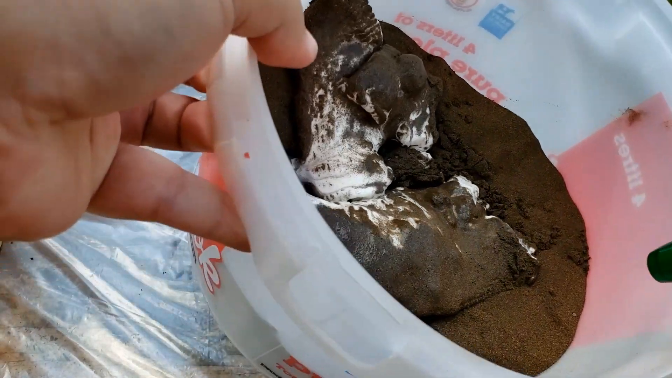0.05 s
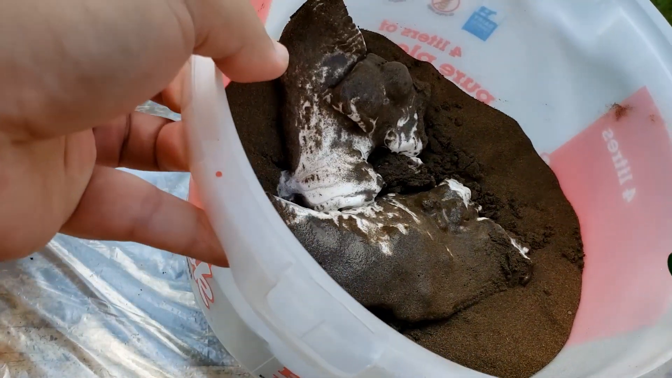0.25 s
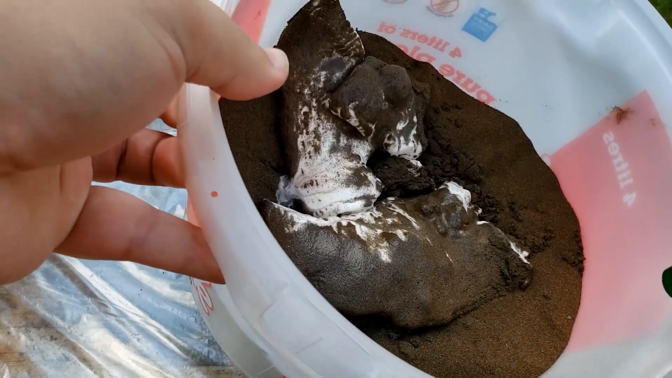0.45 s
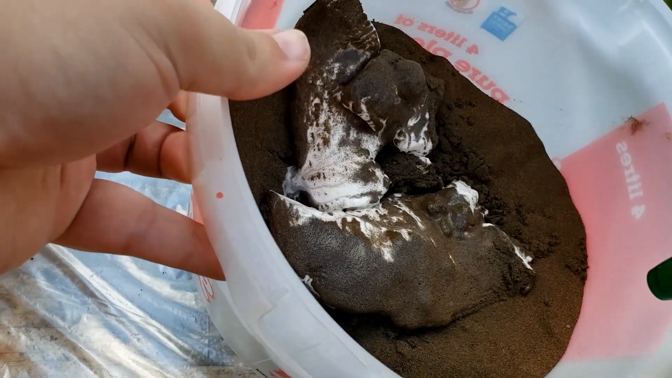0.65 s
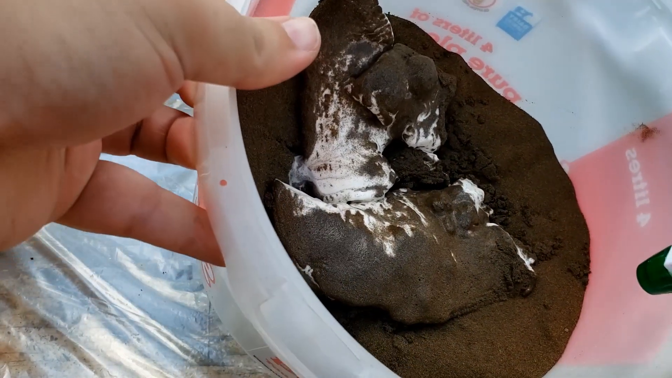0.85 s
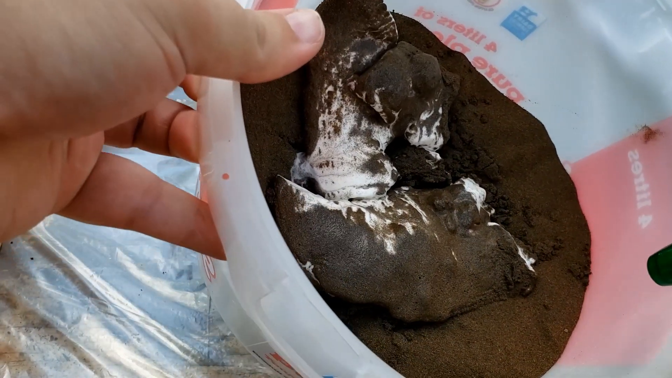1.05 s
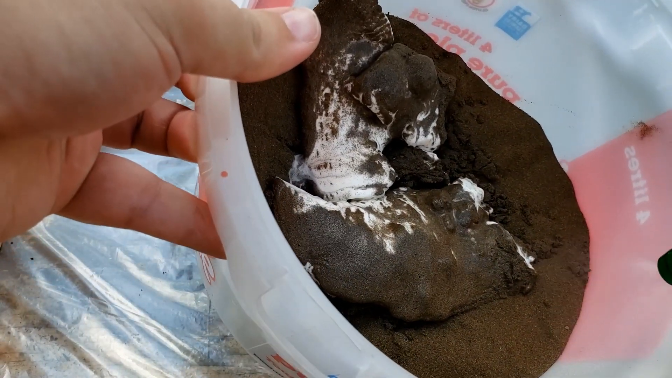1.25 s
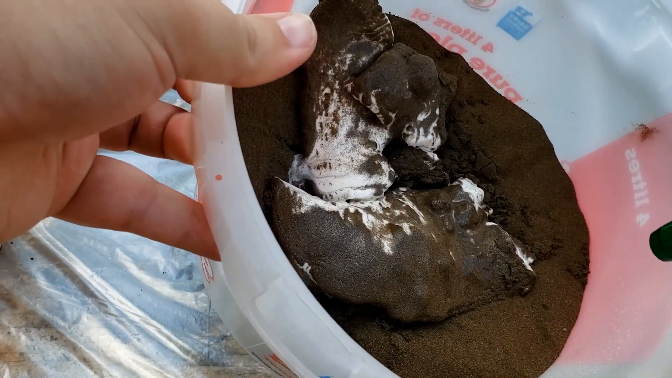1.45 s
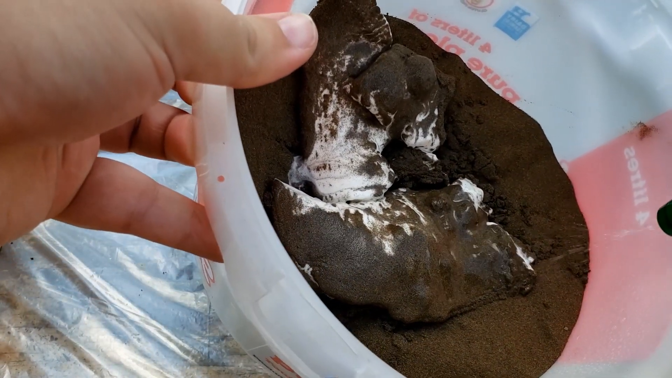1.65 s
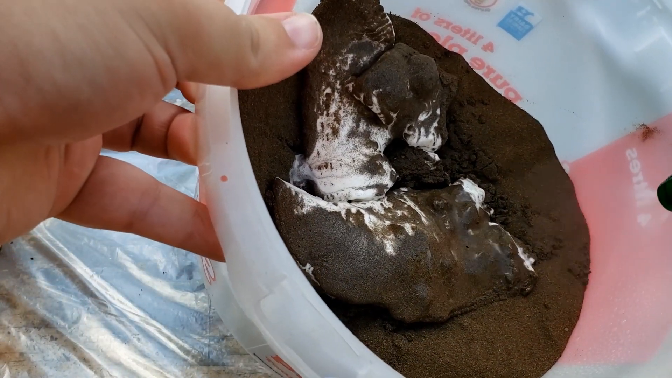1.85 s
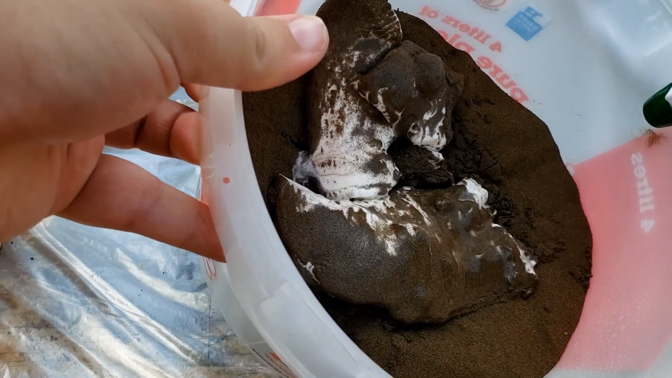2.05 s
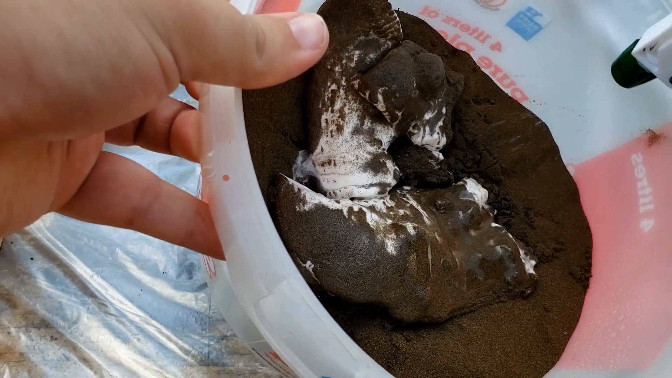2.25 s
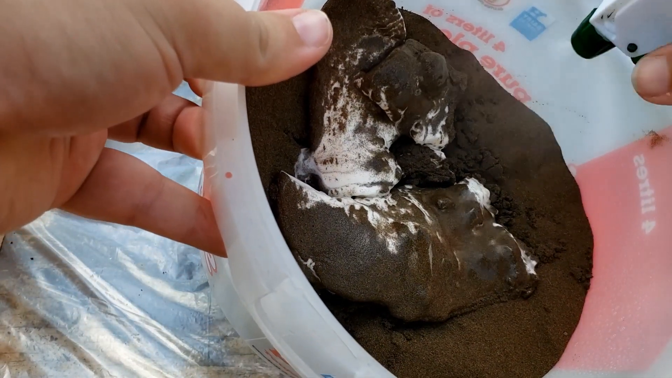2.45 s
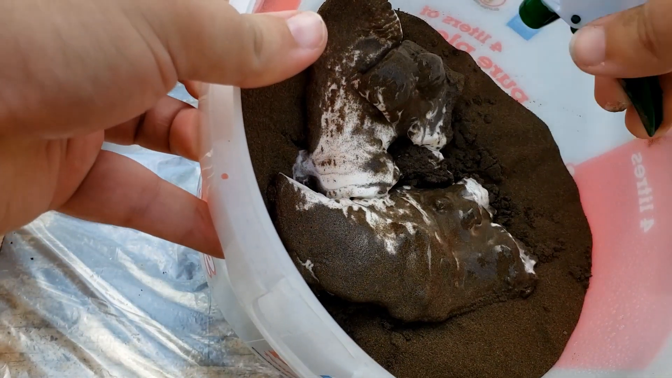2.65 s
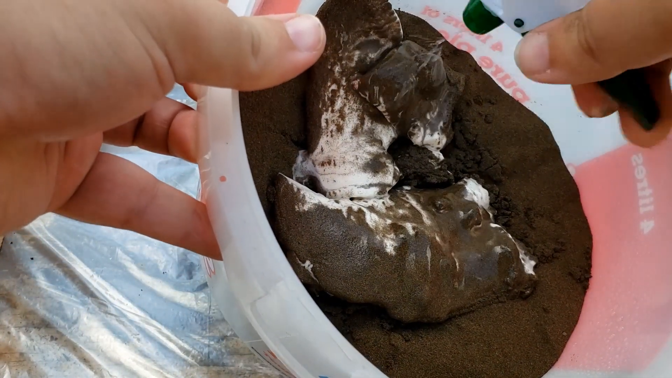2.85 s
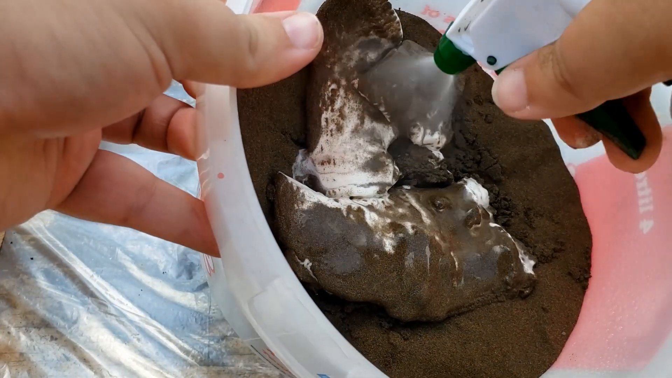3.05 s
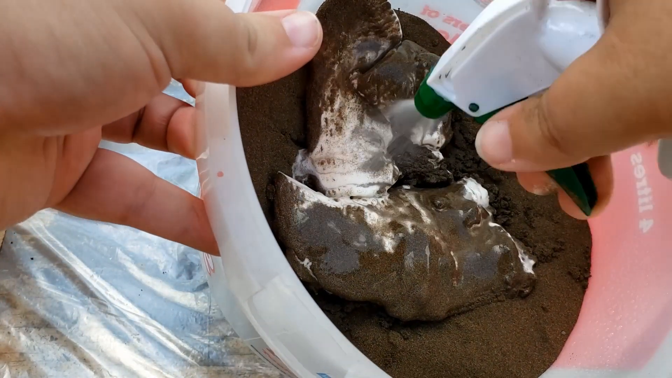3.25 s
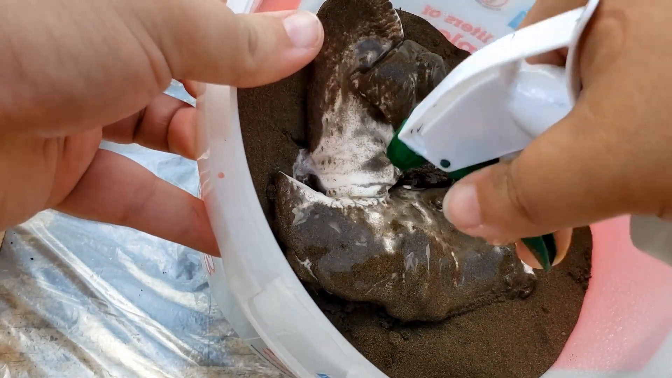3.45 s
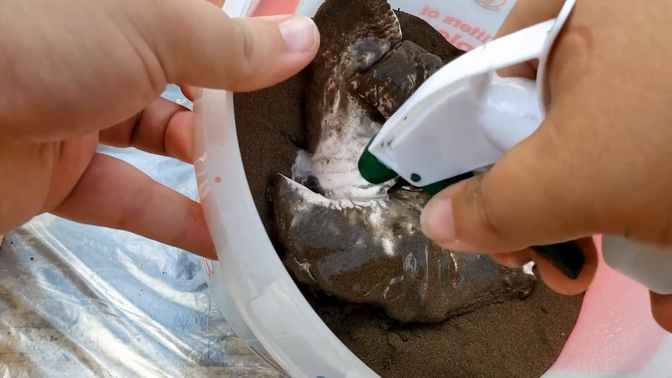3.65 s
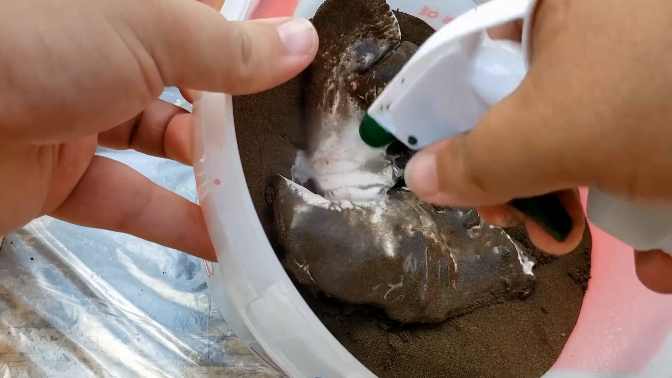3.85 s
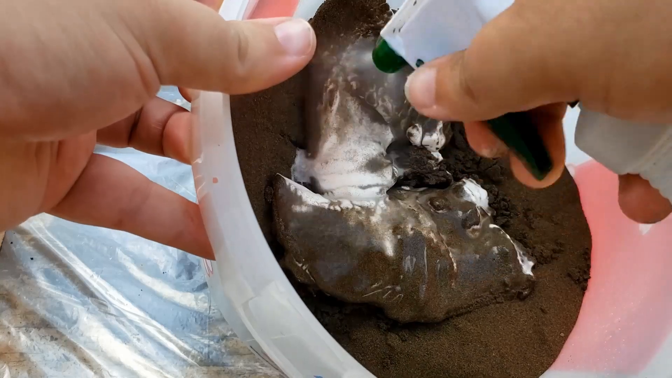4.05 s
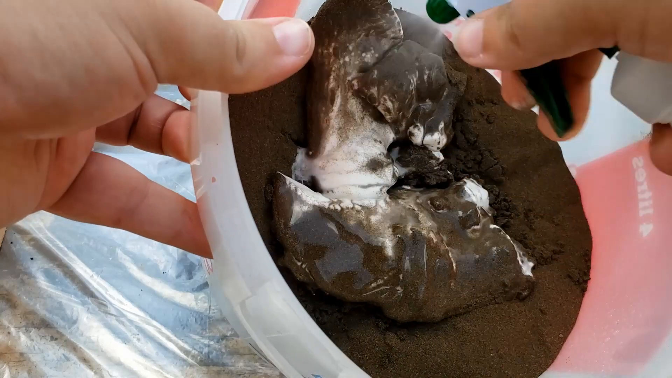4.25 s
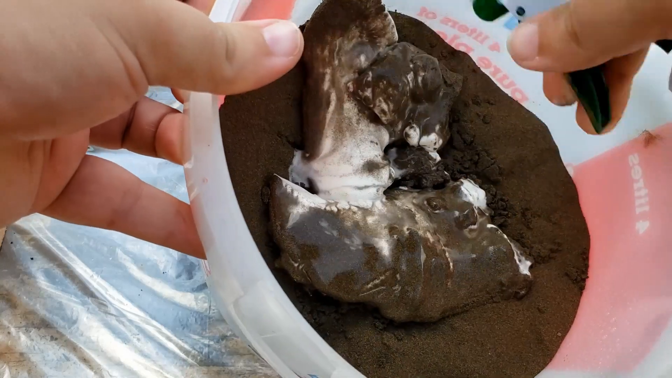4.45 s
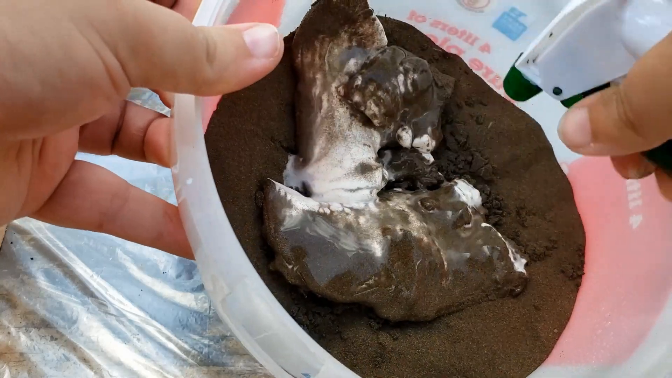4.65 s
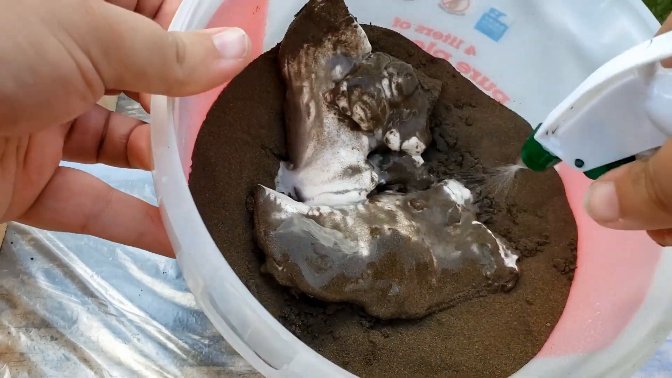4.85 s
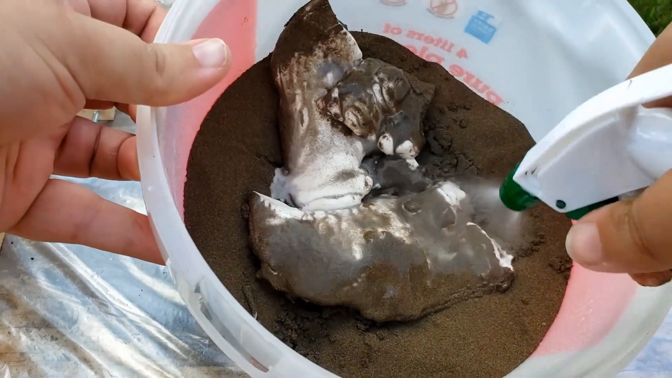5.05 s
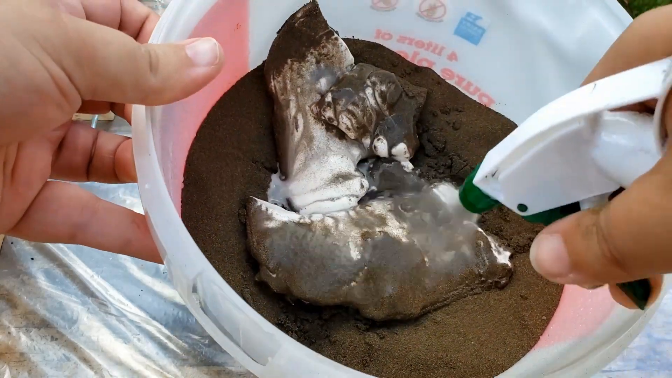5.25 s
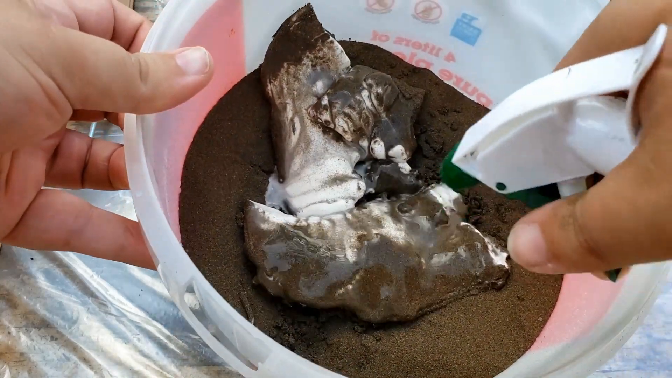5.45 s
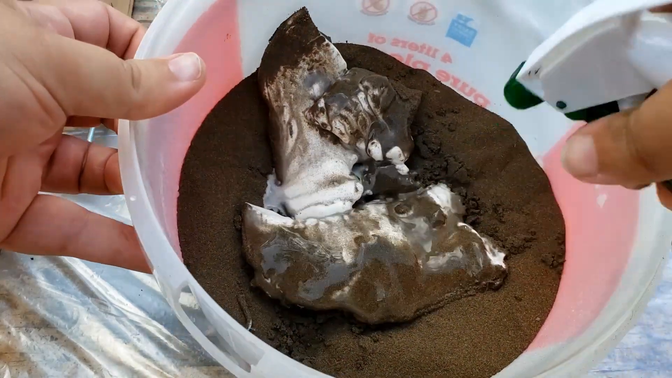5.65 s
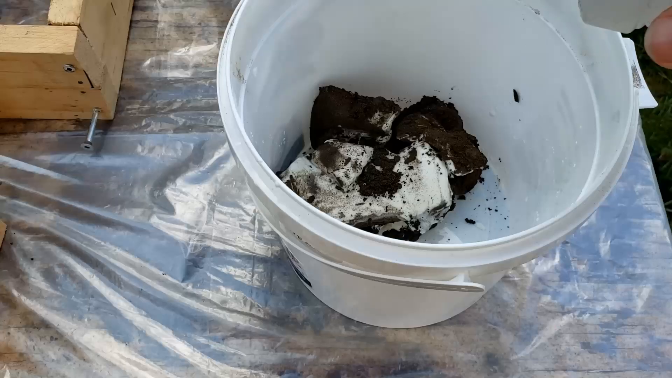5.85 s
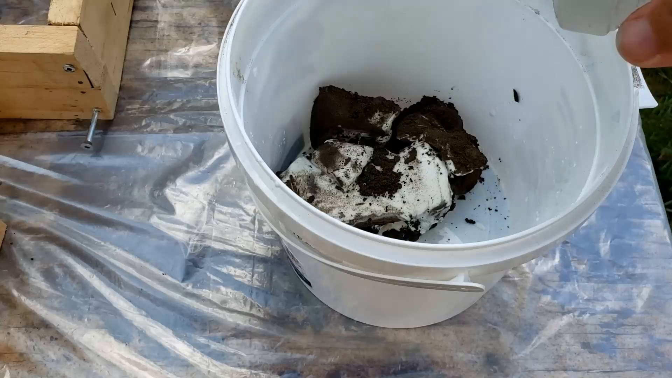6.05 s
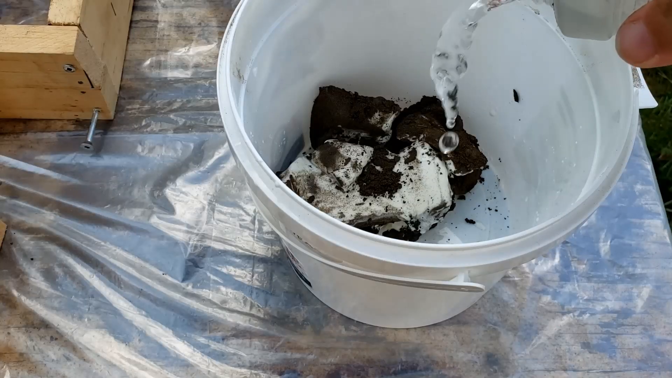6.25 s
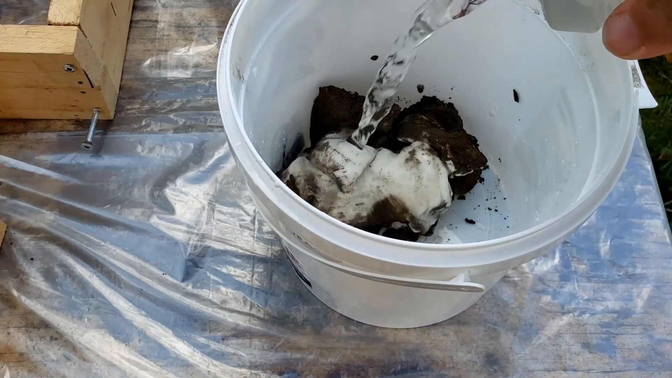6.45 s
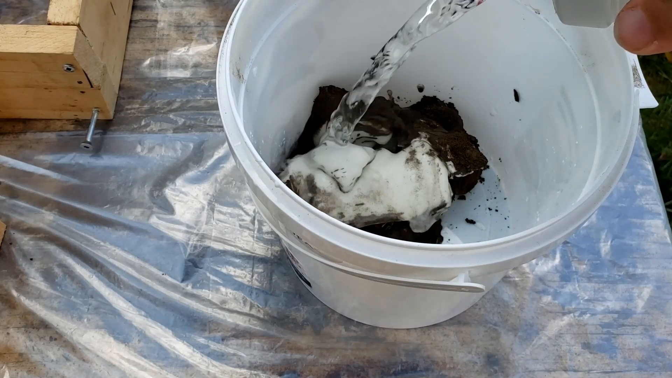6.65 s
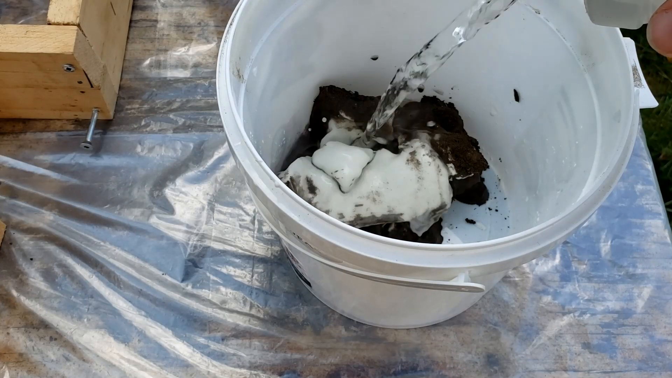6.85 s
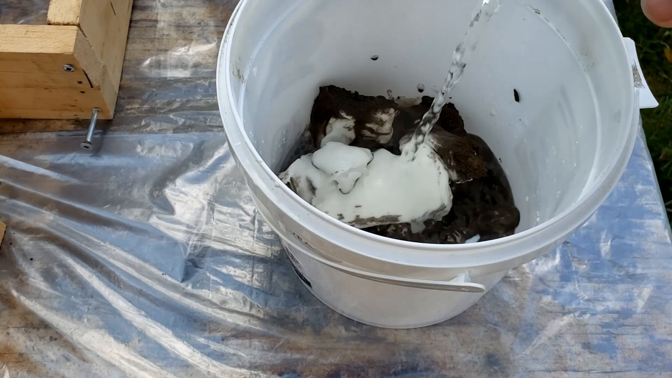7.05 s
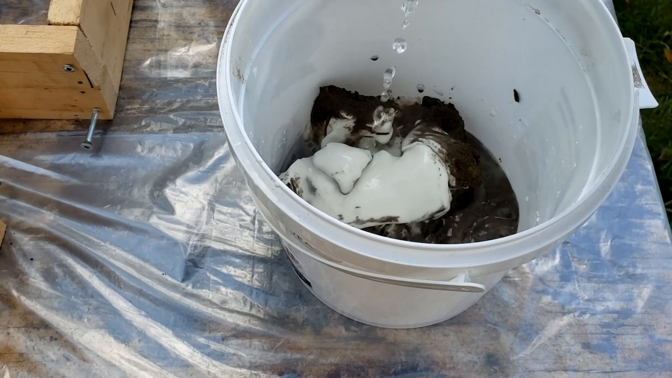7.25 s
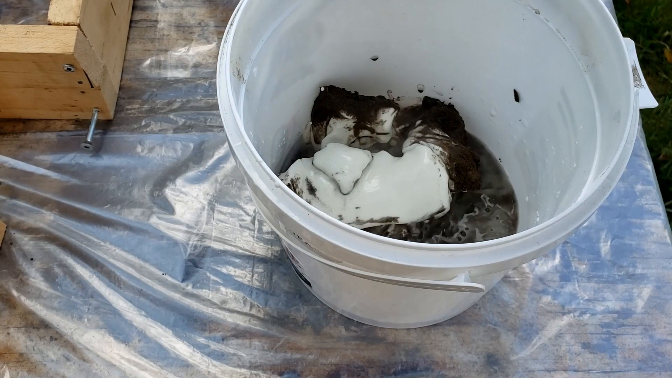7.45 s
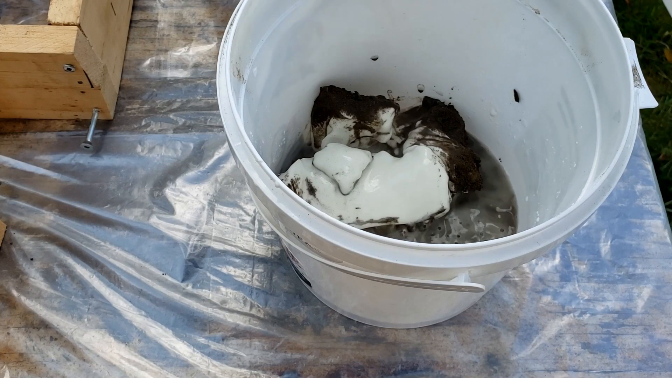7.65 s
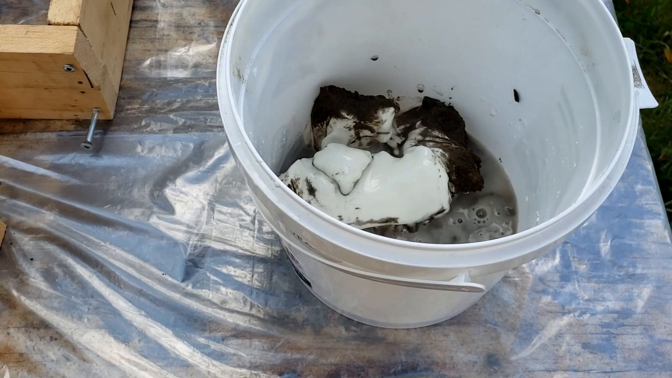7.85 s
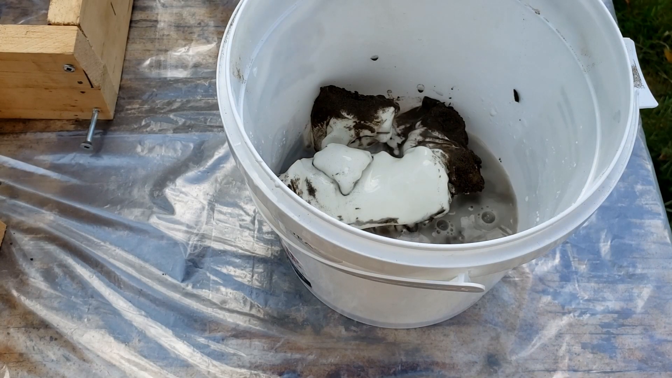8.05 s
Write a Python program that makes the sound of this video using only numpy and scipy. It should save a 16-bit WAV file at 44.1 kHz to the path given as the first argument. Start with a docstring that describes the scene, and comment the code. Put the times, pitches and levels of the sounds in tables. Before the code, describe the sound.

A trigger spray bottle rattles and primes, then squirts rapidly onto sand in a plastic bucket before water is poured in and drips out.

```python
"""Outdoors, over a far engine, rumble and faint bird notes, a hand rustles on a trigger spray bottle and primes it.
Then it squirts water onto sand in a plastic bucket, about four strokes a second. Each is a valve click and a swell
of hiss, patter and mist noise; the trigger knocks back, the spring chirps, wet sand fizzes. Plastic snaps once.
Last, water is poured into the bucket and drips out: showers of ringing bubbles, splats and spatter noise."""
import sys
import numpy as np
from scipy import signal
from scipy.fft import rfft
from scipy.io import wavfile

SR = 44100
rng = np.random.default_rng(int(sys.argv[2]) if len(sys.argv) > 2 else 0)


def transcribe(u):
    """Save the signal u as a 16-bit wav file named by the first command-line argument.

    u: samples, shape (n,) or (channels, n), limited to [-1, 1]; the rate is SR.
    q: integer samples, one column per channel.
    """
    v = np.clip(np.atleast_2d(u).T, -1, 1)
    q = np.round(v * 32767).astype(np.int16)
    wavfile.write(sys.argv[1], SR, q)


N = 357651
TIME_S = np.arange(N) / SR

# All table levels are relative. Spectra, each row: frequency in Hz, level in dB per Hz.
# Outdoor rumble; hand rubbing the bottle; water drawn up the tube; dry tick of plastic.
AIR_SPECTRUM = [(20, -37.5), (35, -18.5), (50, -7.5), (65, -2), (90, -8.5), (140, -8.5), (185, -18.5),
                (240, -23), (410, -25.5), (600, -32.5), (1000, -39.5), (2500, -50), (6500, -67),
                (13000, -59)]
RUSTLE_SPECTRUM = [(450, -3), (750, 5), (1500, -5), (2200, -0.5), (2800, -4), (4000, -8.5), (5600, -13.5),
                   (8000, -23), (11500, -15.5), (16000, -19.5)]
SLOSH_SPECTRUM = [(100, -1), (200, -5.5), (350, 6.5), (450, 6.5), (700, -18.5), (1500, -19.5)]
TICK_SPECTRUM = [(500, 7), (1500, -7.5), (2800, 3), (4000, -0.5), (6500, 2), (8500, -11), (11000, 0.5),
                 (16000, -5)]
# Droplets on the sand; jet in the nozzle; fine mist; poured water spattering on wet sand.
PATTER_SPECTRUM = [(150, -21.5), (300, -10.5), (460, -1.5), (620, -3), (950, -2.5), (1700, -5.5),
                   (2300, -14.5), (3500, -27)]
HISS_SPECTRUM = [(1300, -30), (2000, -0.5), (2500, -4.5), (2950, -4), (3600, -2), (4300, -5.5), (5200, -6),
                 (6800, -11), (8200, -20), (10000, -32)]
MIST_SPECTRUM = [(6000, -15.5), (8500, -14.5), (10000, -8), (11200, -3), (12500, -6), (14000, -4.5),
                 (15400, -4), (17000, -5)]
SPATTER_SPECTRUM = [(2500, -24), (5500, -3.5), (7500, -9.0), (11000, -5.0), (16000, -2.5)]

# Far engine. Each row: time in seconds, firing level in dB, octave level in dB.
HUM_CURVE = [(0, -51, -66), (.5, -63, -65.5), (1.3, -52.5, -71), (2.9, -49, -77.5), (3.8, -48, -63),
             (4.2, -53.5, -61), (4.8, -50, -61), (5.5, -66.5, -69.5), (5.75, -46.5, -65),
             (6.1, -50.5, -62.5), (8.1, -48.5, -56.5)]
# Faint high bird notes. Each row: start in seconds, length in seconds, frequency in Hz.
BIRD_NOTES = [(5.995, 0.097, 7400), (6.07, 0.15, 8100), (6.312, 0.063, 7590), (7.44, 0.098, 7500),
              (7.71, 0.15, 8260), (7.776, 0.17, 7460), (8.044, .1, 8150)]
# Hand's grip on the bottle. Each row: time in seconds, rustle level in dB.
GRIP_CURVE = [(0, -66), (.75, -64.5), (1.0, -66), (1.3, -70), (1.8, -64.5), (3.7, -59.5), (5.3, -61),
              (5.85, -65)]
# Creaks of the bottle's plastic and stray chirps of its spring near 2.8 kHz.
# Each row: start in seconds, level in dB, nominal frequency in Hz.
CREAKS_AND_CHIRPS = [(0.0165, -47, 1250), (0.043, -52, 1600), (0.0544, -53, 1360), (.09, -56, 1820),
                     (0.108, -51, 1310), (.1524, -47.5, 2770), (0.803, -52.5, 2765), (.8709, -54, 2765),
                     (1.274, -38, 2730), (2.754, -42, 2810)]
# Loose trigger rattling in the hand. Each row: start in seconds, tick level in dB, thump level in dB.
RATTLES = [(.102, -64, -48.5), (0.2448, -47, -46.5), (0.2905, -46, -62), (0.5915, -52, -48),
           (0.9573, -43, -65), (1.065, -53, -50.5), (1.8333, -43.5, -43.5), (2.1356, -46, -45.5),
           (2.199, -37.5, -55), (2.4215, -44.5, -58), (5.8003, -40, -45), (5.8193, -41, -58)]
# Modes of the filled bottle. Each row: frequency in Hz, level in dB, 60 dB decay in seconds.
BOTTLE_MODES = [(175, -8, 0.05), (252, -3.5, 0.09), (327, -0.5, 0.058), (398.3, 1.5, .035),
                (500, -22, .025)]
# Priming puffs, mostly air. Each row: peak in seconds, half length in seconds, hiss level in dB, mist level in dB.
PUFFS = [(0.303, 0.026, -45, -47.5), (0.45, 0.026, -65.5, -70), (.602, .018, -48.5, -58.5),
         (0.979, .036, -53, -49.5), (1.088, .02, -61.5, -60)]
# Trigger strokes. Each row: valve opening in seconds, pressure peak in seconds, force as hiss level in dB,
# mist level in dB, valve click level in dB, returning spring's chirp level in dB.
STROKES = [(1.259, 1.335, -42.5, -40.5, -50, -60), (1.5815, 1.651, -42, -42.5, -44, -66),
           (1.8647, 1.946, -42, -44, -47, -68), (2.1635, 2.241, -42, -45.5, -39.5, -56),
           (2.467, 2.536, -41.5, -44, -40.5, -43.5), (2.767, 2.836, -39.5, -42.5, -46.5, -39),
           (3.05, 3.124, -39.5, -43, -36.5, -40), (3.3225, 3.392, -40.5, -45.5, -38, -47),
           (3.5847, 3.656, -37.5, -42.5, -33.5, -39), (3.8521, 3.913, -38, -43, -34.5, -47),
           (4.0847, 4.152, -38.5, -44.5, -55, -47), (4.3245, 4.388, -37.5, -41.5, -42.5, -35),
           (4.573, 4.631, -38, -39.5, -33, -60), (4.8076, 4.876, -40, -43, -40, -56),
           (5.0514, 5.127, -38.5, -40.5, -41, -45.5), (5.3155, 5.387, -37.5, -42, -37.5, -60),
           (5.5532, 5.615, -38.5, -43, -39.5, -63)]
# Nozzle position. Each row: time in seconds, gap to the sand in m, left lag in ms, patter against hiss in dB.
NOZZLE_CURVE = [(1.3, 0.29, .13, -4.5), (2.3, 0.19, 0.13, -3), (3.1, 0.13, -0.036, -2),
                (4.1, 0.13, -0.084, -3), (4.7, 0.069, 0.051, -4), (5.6, 0.072, 0.011, -4.5)]
# Hard snap of plastic. Each row: start in seconds, level in dB.
SNAPS = [(5.107, -8)]
# Modes of the snapped plastic. Each row: frequency in Hz, level in dB, 60 dB decay in seconds.
SNAP_MODES = [(220, -28.5, 0.073), (505, -16, 0.0067), (1275.3, -7.5, 0.012), (2060, -1, 0.013),
              (2817, -4, 0.021), (3500, -11, 0.024), (5000, -7.5, 0.0069)]
# Pour. Each row: time in seconds, gurgle level in dB, splash level in dB, spatter level in dB.
POUR_CURVE = [(6.35, -90, -99, -95), (6.44, -76.5, -65, -63.5), (6.58, -51.5, -55, -60),
              (6.69, -44.5, -54.5, -60.5), (6.79, -51, -54, -59.5), (6.99, -53, -45.5, -56),
              (7.12, -59.5, -60.5, -67.5), (7.31, -69, -51.5, -65), (7.40, -80, -69, -72),
              (7.51, -65, -72, -75), (7.59, -54, -63, -78), (7.63, -68, -77, -85), (7.75, -80, -91, -95)]
# Largest drops. Each row: start in seconds, bubble level in dB, bubble frequency in Hz, splat level in dB.
DROPS = [(6.412, -39, 5900, -44), (6.518, -39, 1540, -33.5), (6.54, -26.5, 4750, -46),
         (6.595, -28.5, 3600, -59), (6.6807, -27, 1460, -45), (6.9455, -26.5, 3460, -48),
         (7.305, -28, 3280, -45), (7.315, -38, 1720, -46), (7.3466, -37, 2920, -38),
         (7.5245, -31.5, 3020, -61), (7.534, -32, 1880, -75), (7.575, -37, 1640, -79),
         (7.5934, -32.5, 1880, -78)]
# Air modes of the bucket. Each row: frequency in Hz, width in Hz, level in dB.
BUCKET_MODES = [(475, 40, 8.5), (1027, 27, -8), (1610, 280, -7), (1747, 9, 1.5), (2550, 110, -7.5),
                (3710, 130, -11), (4820, 220, -15.5)]

AIR_DB = -49
ENGINE_HZ, ENGINE_WAVER_SHARE = 89.6, .035   # mean firing rate; spread of its wander
REFILL_LAG_S, REFILL_HALF_S, REFILL_DB = .12, .04, -68.5   # pump sucks water back, lag from each peak
SPRING_HZ = 2826   # nominal
# Slack is taken up before the valve opens; after the peak the trigger knocks back, then the spring chirps.
SLACK_S, KNOCK_S, CHIRP_S = .028, .12, .143
CHIRP_LEAD_S = 0.00141   # spring slips just before the valve opens
SLACK_DB, THUMP_DB, VALVE_CHIRP_DB = -17.5, -3, -2.5   # slack and chirp against valve click, thump against tick
KNOCK_DB, KNOCK_DB_PER_DB = -46, 2.2   # at the usual force; follows force
KNOCK_TICK_DB, CHIRP_TICK_DB = -5.5, -11   # dry contact noise against knock, chirp
PUFF_PATTER_DB = -16   # against hiss
# Every stroke pumps the same water, so a harder one is shorter: dB of length lost per dB of force.
USUAL_FORCE_DB, HALF_LENGTH_S, SHORTENING_DB_PER_DB = -38.5, 0.048, 0.18
SOUND_M_PER_S = 343
FIZZ_DB, FIZZ_S = -67.5, 0.13   # level; decay to 1/e
GLUG_DB, GLUG_DB_PER_DB = -60.5, 1.8   # at the fullest flow; follows gurgle
BUBBLE_RISE_SHARE = .08   # pitch climb over the ring
CUTOFF_HZ = 15800


def from_db(db):
    """Amplitude of a dB level."""
    return 10 ** (np.asarray(db) / 20)


def rms_one(x):
    """Scale to rms 1."""
    return x / np.sqrt(np.mean(x ** 2) + 1e-20)


def in_time(rows, outside=None):
    """Columns of a curve table at every sample."""
    time_s, *columns = np.transpose(rows)
    return [np.interp(TIME_S, time_s, column, outside, outside) for column in columns]


def add(out, start_s, sound):
    """Mix in a short sound."""
    at = round(start_s * SR)
    out[..., at:at + sound.shape[-1]] += sound[..., :N - at]


def colour(x, spectrum, left_lag_ms=0):
    """Give a stereo signal a spectrum and delay its left side; rms 1."""
    hz = np.fft.rfftfreq(x.shape[-1], 1 / SR)
    points_hz, level_db = np.transpose(spectrum)
    gain = from_db(np.interp(np.log(hz + 1), np.log(points_hz), level_db))
    delay = np.exp(-2j * np.pi * hz * np.array([[left_lag_ms], [0]]) / 1000)
    return rms_one(np.fft.irfft(rfft(x) * gain * delay, x.shape[-1]))


def noise(size, alike, grain_db=0):
    """Stereo noise of tiny impacts of uneven size; alike is the power share common to both sides."""
    white = rng.standard_normal((3, size))
    grain = np.minimum(rng.exponential(1, (3, size)), 6)
    white = white * from_db(grain_db * grain)
    return np.sqrt(alike) * white[2] + np.sqrt(1 - alike) * white[:2]


def drift(points_per_s, size=N):
    """Slow chance: straight lines between normal draws of spread 1."""
    return np.interp(TIME_S[:size] * points_per_s, np.arange(4000), rng.standard_normal(4000))


def ring(x, hz, t60_s):
    """Two-pole mode: a unit click sets a decaying sine of initial height 1 ringing."""
    r, w = from_db(-60 / (t60_s * SR)), 2 * np.pi * hz / SR
    return signal.lfilter([0, np.sin(w)], [1, -2 * r * np.cos(w), r * r], x + 1e-18)


def resonance(x, hz, width_hz):
    """Band-pass with peak gain about 1."""
    r = np.exp(-np.pi * width_hz / SR)
    top = np.array([1, 0, -1]) * (1 - r * r) / 2
    return signal.lfilter(top, [1, -2 * r * np.cos(2 * np.pi * hz / SR), r * r], x)


def walls(x, echo_db, reach_s, count=8):
    """Short reflections at random delays and signs, different for each side."""
    out = x * np.ones((2, 1))
    for side, direct in zip(out, out.copy()):
        for share, sign in zip(rng.uniform(.08, 1, count), rng.choice([-1, 1], count)):
            lag = 1 + int(share * reach_s * SR)
            side[lag:] += sign * from_db(echo_db) * np.exp(-share) * direct[:-lag]
    return out


def burst(spectrum, t60_s, alike, size=2048):
    """A contact: coloured noise with instant onset and exponential decay."""
    decay = np.exp(-np.log(1000) * np.arange(size) / SR / t60_s)
    return colour(noise(size, alike), spectrum) * decay


def swell(t_s, half_s):
    """Pressure of one squeeze: 1 at t = 0, 1/e at half_s either side."""
    return np.exp(-np.abs(t_s / half_s) ** 2.49)


def bubbles(low_hz, high_hz, per_s, cycles, spread_db, during, rise_share=0):
    """Bubbles or small slips start at random within a curve's span, each decaying 60 dB at its own pitch."""
    out, first_s, last_s = np.zeros(N), during[0][0], during[-1][0]
    chance = rng.random((4000, 4))
    starts_s = first_s + np.cumsum(-np.log(1 - chance[:, 0])) / per_s
    for start_s, (_, pitch, size, sign) in zip(starts_s[starts_s < last_s], chance):
        hz = low_hz * (high_hz / low_hz) ** pitch
        age = np.arange(int(cycles / hz * SR)) * hz / cycles / SR   # 0 to 1 over the ring
        height = from_db(spread_db * min(-np.log(1 - size), 3.5)) * np.sign(sign - .5)
        tone = np.sin(2 * np.pi * cycles * age * (1 + rise_share * age / 2))
        add(out, max(start_s, 0), height * np.exp(-np.log(1000) * age) * tone)
    return rms_one(out) * np.sqrt((last_s - first_s) * SR / N)


def outdoors():
    """Noise rumble, a far engine as two wavering harmonics, and bird notes of narrow-band noise."""
    firing_db, octave_db = in_time(HUM_CURVE)
    phase = 2 * np.pi * np.cumsum(ENGINE_HZ * (1 + ENGINE_WAVER_SHARE * drift(8))) / SR
    hum = from_db(firing_db + 2 * drift(30)) * np.sin(phase)
    hum += from_db(octave_db + 3.6 * drift(2.5)) * np.sin(2 * phase)
    out = hum + from_db(AIR_DB) * colour(noise(N, alike=0.24), AIR_SPECTRUM)
    for start_s, length_s, hz in BIRD_NOTES:
        hiss = rng.standard_normal((2, int(length_s * SR)))
        note = rms_one(resonance(resonance(hiss, hz, 350), hz, 350))
        add(out, start_s, from_db(-79.5) * note * np.hanning(note.shape[-1]))
    return out


def rustle():
    """The hand rubs on the bottle; after each stroke the piston scrapes back and water is drawn up the tube."""
    grip_db, = in_time(GRIP_CURVE, outside=-120)
    refill = sum(swell(TIME_S - peak_s - REFILL_LAG_S, REFILL_HALF_S) for _, peak_s, *_ in STROKES)
    rub = colour(noise(N, alike=0.077, grain_db=5.5), RUSTLE_SPECTRUM)
    rub = from_db(-1.5 + 2.1 * drift(25)) * rub
    slips = bubbles(2300, 2900, per_s=150, cycles=45, spread_db=0.5, during=GRIP_CURVE)
    scrape = from_db(-17.0) * walls(slips, echo_db=-7.5, reach_s=0.0031)
    slosh = from_db(-0.5 + 2 * drift(35)) * colour(noise(N, alike=0.25), SLOSH_SPECTRUM)
    return np.hypot(from_db(grip_db), from_db(REFILL_DB) * refill) * (rub + scrape + slosh)


def squeak(hz, slip_s=0.00078, size=2048):
    """One slip of a creak or chirp, then a weaker one at a slightly different pitch."""
    t_s = np.arange(size) / SR
    first = t_s / slip_s
    second = np.maximum(t_s - rng.uniform(.003, .008), 0) / slip_s
    tones = np.sin(2 * np.pi * hz * rng.normal(1, [[.012], [.05]]) * t_s)
    slips = first * np.exp(1 - first) * tones[0] + 0.7 * second * np.exp(1 - second) * tones[1]
    return walls(slips, echo_db=-12, reach_s=.004)


def creaks_and_chirps():
    """Creaks of the bottle's plastic and stray chirps of its spring near 2.8 kHz: slips with contact noise."""
    out = np.zeros((2, N))
    for start_s, db, hz in CREAKS_AND_CHIRPS:
        add(out, start_s, from_db(db - 4.0) * squeak(hz, slip_s=0.0016))
        add(out, start_s, from_db(db - 6.0) * burst(RUSTLE_SPECTRUM, t60_s=0.067, alike=0.2))
    return out


def bottle_thump(size=2048):
    """A soft push rings the filled bottle, each mode with a strength of its own."""
    push, out = signal.unit_impulse(size), np.zeros(size)
    for k, (hz, db, t60_s) in enumerate(BOTTLE_MODES):
        out += from_db(db + rng.normal(0, 1.0)) * ring(push, hz, t60_s) * (-1) ** k
    return out


def click(tick_db, thump_db):
    """A tick of plastic that also thumps the bottle."""
    tick = from_db(tick_db + 1.5) * burst(TICK_SPECTRUM, t60_s=0.036, alike=0.14)
    return tick + from_db(thump_db) * bottle_thump()


def trigger():
    """Loose rattles; every stroke: slack tick, valve click with a chirp, return knock, spring chirp."""
    out = np.zeros((2, N))
    for start_s, tick_db, thump_db in RATTLES:
        add(out, start_s, click(tick_db, thump_db))
    for start_s, peak_s, force_db, _, click_db, spring_db in STROKES:
        add(out, start_s - SLACK_S, click(click_db + SLACK_DB, click_db + SLACK_DB + THUMP_DB))
        add(out, start_s - CHIRP_LEAD_S, from_db(click_db + VALVE_CHIRP_DB) * squeak(SPRING_HZ))
        add(out, start_s, click(click_db, click_db + THUMP_DB))
        knock_db = KNOCK_DB + KNOCK_DB_PER_DB * (force_db - USUAL_FORCE_DB)
        contact = from_db(KNOCK_TICK_DB) * burst(RUSTLE_SPECTRUM, t60_s=0.062, alike=0.2)
        add(out, peak_s + KNOCK_S, from_db(knock_db) * (bottle_thump() + contact))
        contact = from_db(CHIRP_TICK_DB) * burst(HISS_SPECTRUM, t60_s=0.033, alike=0.16)
        add(out, peak_s + CHIRP_S, from_db(spring_db - 1.5) * (squeak(SPRING_HZ) + contact))
    return out


def nozzle_at(time_s):
    """Gap in m, left lag in ms and patter against hiss in dB at one time."""
    times_s, *columns = np.transpose(NOZZLE_CURVE)
    return [np.interp(time_s, times_s, column) for column in columns]


def jet(pressure, patter_db, hiss_db, mist_db, gap_m, left_lag_ms):
    """Hiss and mist follow the pressure; patter rises more steeply with it."""
    size = len(pressure)
    pressure = pressure * from_db(1.0 * drift(120, size=size))   # the jet sputters a little
    patter = colour(noise(size, alike=0.75, grain_db=2.5), PATTER_SPECTRUM, left_lag_ms)
    patter = from_db(1.54 * drift(45, size=size)) * patter
    hiss = colour(noise(size, alike=0.6, grain_db=3.0), HISS_SPECTRUM, left_lag_ms)
    mist = colour(noise(size, alike=0.19, grain_db=1.0), MIST_SPECTRUM, left_lag_ms)
    gap_hz = SOUND_M_PER_S / (2 * gap_m)   # a narrower gap between nozzle and sand rings higher
    # a smaller wet patch has fewer lows
    patter = signal.sosfilt(signal.butter(2, .22 * gap_hz, "high", fs=SR, output="sos"), patter)
    patter = rms_one(patter + 1.0 * resonance(patter, gap_hz, width_hz=440))
    hiss = rms_one(walls(hiss, echo_db=-11, reach_s=.004))
    mist = rms_one(walls(mist, echo_db=-13, reach_s=.003))
    body = from_db(patter_db) * pressure ** 1.28 * patter + from_db(hiss_db + 0.76) * pressure * hiss
    return body * from_db([[.6], [-.6]]) + from_db(mist_db + 6.0) * pressure ** 0.9 * mist


def squirts(size=12000):
    """Puffs prime the pump; then each stroke opens the valve and its pressure swells and fades."""
    out, t_s = np.zeros((2, N)), np.arange(size) / SR
    for peak_s, half_s, hiss_db, mist_db in PUFFS:
        gap_m, lag_ms, _ = nozzle_at(peak_s)
        pressure = swell(t_s - 2 * half_s, half_s)
        puff = jet(pressure, hiss_db + PUFF_PATTER_DB, hiss_db, mist_db, gap_m, lag_ms)
        add(out, peak_s - 2 * half_s, puff)
    for start_s, peak_s, force_db, mist_db, _, _ in STROKES:
        gap_m, lag_ms, patter_db = nozzle_at(peak_s)
        half_s = HALF_LENGTH_S * from_db(-SHORTENING_DB_PER_DB * (force_db - USUAL_FORCE_DB))
        pressure = swell(start_s + t_s - peak_s, half_s) + from_db(-42) * np.exp(-t_s / 0.085)
        valve = 1 - np.exp(-t_s / 0.0028)
        add(out, start_s, valve * jet(pressure, force_db + patter_db, force_db, mist_db, gap_m, lag_ms))
    return out


def fizz():
    """Tiny bubbles burst as the water of each squirt soaks in: grainy noise dying from each peak."""
    soaking = np.zeros(N)
    for _, peak_s, *_ in STROKES:
        soaking += (TIME_S > peak_s) * np.exp(-np.abs(TIME_S - peak_s) / FIZZ_S)
    return from_db(FIZZ_DB) * soaking * colour(noise(N, alike=.2, grain_db=6.0), MIST_SPECTRUM)


def snap(size=4096, left_lag_s=.00012):
    """A hard crack, a little to the right, that rings the modes of the plastic briefly."""
    out, push = np.zeros((2, N)), signal.unit_impulse(size)
    rise = 1 - np.exp(-np.arange(size) / SR / 0.0004)   # the crack takes a moment to run
    for start_s, db in SNAPS:
        modes = np.zeros(size)
        for k, (hz, mode_db, t60_s) in enumerate(SNAP_MODES):
            modes += from_db(mode_db) * ring(push, hz, t60_s) * (-1) ** k
        add(out[0], start_s + left_lag_s, from_db(db + 4) * rise * modes)
        add(out[1], start_s, from_db(db + 5.0) * rise * modes)
        add(out, start_s, from_db(db - 1.0) * burst(TICK_SPECTRUM, t60_s=0.0037, alike=0.55))
    return out


def in_bucket(x):
    """Air modes and wall reflections of the open bucket; small bubbles radiate few lows."""
    modes = sum(from_db(db) * resonance(x, hz, width_hz) for hz, width_hz, db in BUCKET_MODES)
    direct = signal.sosfilt(signal.butter(3, 1150, "high", fs=SR, output="sos"), x)
    return walls(0.6 * direct + 0.6 * modes, echo_db=-7, reach_s=0.0083)


def pour():
    """A blobby stream gurgles, splashes and spatters on wet sand; the fullest flow traps big bubbles."""
    gurgle_db, splash_db, spatter_db = in_time(POUR_CURVE, outside=-120)
    blobs_db = 1.8 * drift(55)
    water = dict(during=POUR_CURVE, rise_share=BUBBLE_RISE_SHARE)
    gurgle = in_bucket(bubbles(1300, 2600, per_s=380, cycles=25, spread_db=2.5, **water))
    splash = in_bucket(bubbles(2540, 6540, per_s=700, cycles=24, spread_db=3.5, **water))
    glug = bubbles(780, 1300, per_s=230, cycles=16, spread_db=2.5, **water)
    glug = walls(glug, echo_db=-2, reach_s=.008)
    spatter = colour(noise(N, alike=0.23, grain_db=5.0), SPATTER_SPECTRUM)
    droplets = bubbles(5100, 15000, per_s=370, cycles=33, spread_db=5.5, during=POUR_CURVE)
    spatter += 0.45 * walls(droplets, echo_db=0.0, reach_s=0.0067)
    stream = from_db(gurgle_db + 2.5) * gurgle + from_db(splash_db + 2.5) * splash
    stream += from_db(GLUG_DB + GLUG_DB_PER_DB * (gurgle_db - gurgle_db.max())) * glug
    return from_db(blobs_db) * stream + from_db(spatter_db + 6.5) * spatter


def drops(size=2048):
    """A large drop lands with a splat and traps a ringing bubble."""
    bubble, splat, push = np.zeros(N), np.zeros((2, N)), signal.unit_impulse(size)
    for start_s, db, hz, splat_db in DROPS:
        add(bubble, start_s, from_db(db) * ring(push, hz, 28 / hz))
        add(splat, start_s, from_db(db - 17.0) * burst(HISS_SPECTRUM, t60_s=0.012, alike=0.58))
        add(splat, start_s, from_db(splat_db + 5.0) * burst(MIST_SPECTRUM, t60_s=0.013, alike=0.36))
    return in_bucket(bubble) + splat


def scene():
    """Sum of all sources."""
    handling = outdoors() + rustle() + creaks_and_chirps() + trigger()
    return handling + squirts() + fizz() + snap() + pour() + drops()


def record(dry):
    """Two close ports hear the lows alike; left has a presence peak and deep notch; peaks rounded, top cut."""
    side = (dry[0] - dry[1]) / 2
    low_side = 0.6 * signal.sosfilt(signal.butter(1, 600, fs=SR, output="sos"), side)
    left, right = dry[0] - low_side, dry[1] + low_side
    left = from_db(1.29) * (left + 0.61 * resonance(left, 3900, width_hz=260))
    left = left - .94 * signal.lfilter(*signal.iirpeak(8400, 1.5, fs=SR), left)
    rounded = .65 * np.tanh(np.array([left, right]) / .65)
    return signal.sosfilt(signal.ellip(12, .1, 80, CUTOFF_HZ, fs=SR, output="sos"), rounded)


dry = scene()
out = record(dry)
transcribe(out)
```